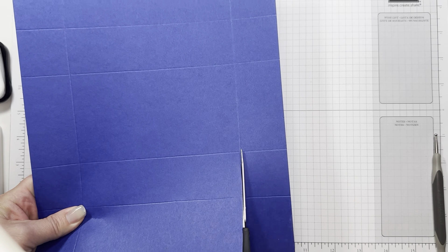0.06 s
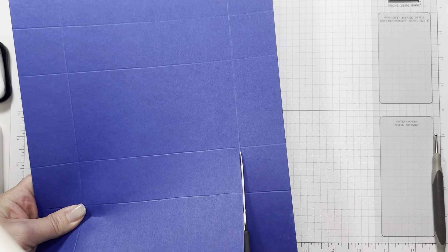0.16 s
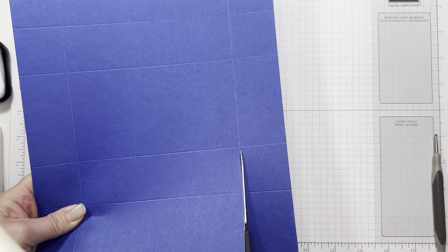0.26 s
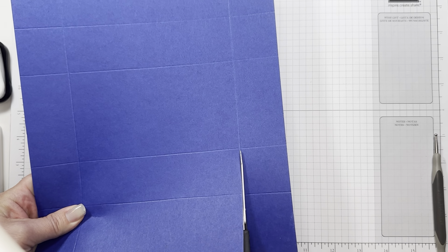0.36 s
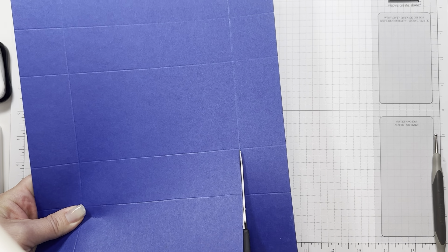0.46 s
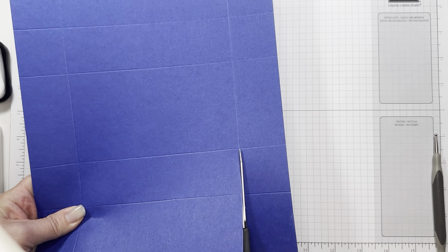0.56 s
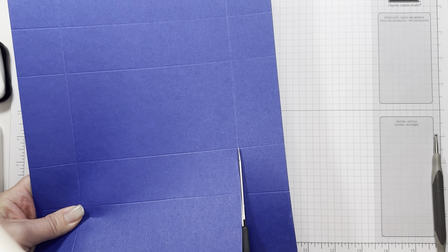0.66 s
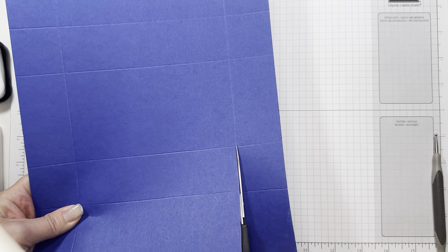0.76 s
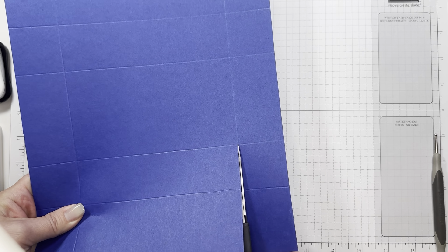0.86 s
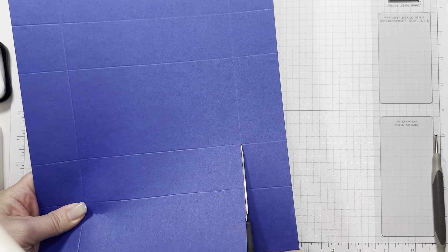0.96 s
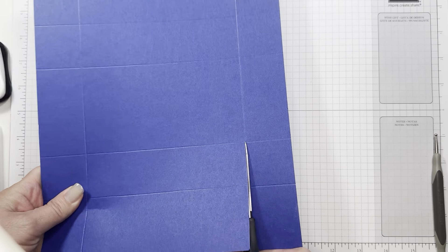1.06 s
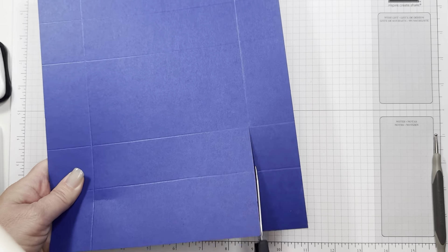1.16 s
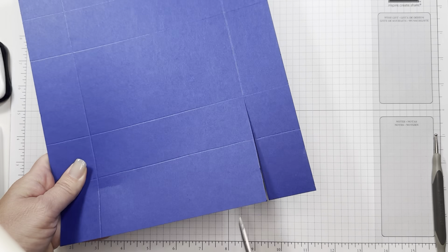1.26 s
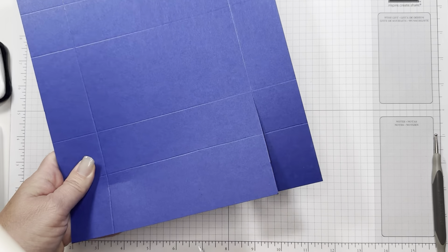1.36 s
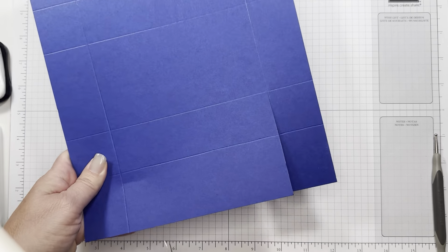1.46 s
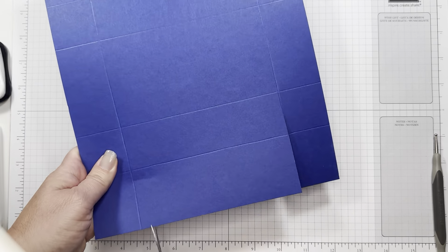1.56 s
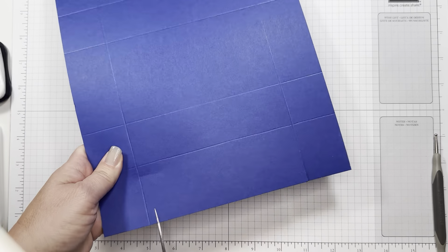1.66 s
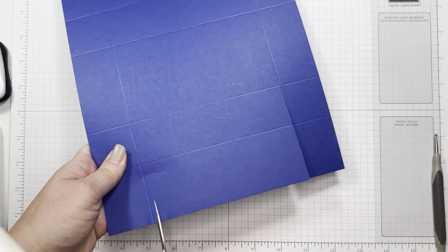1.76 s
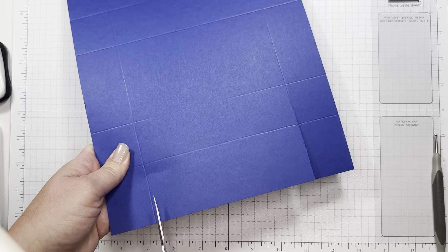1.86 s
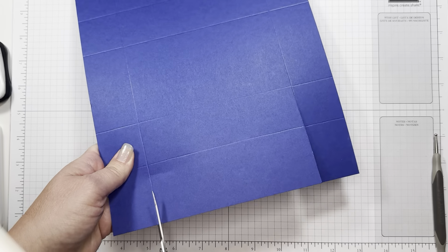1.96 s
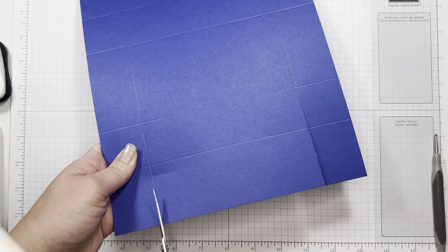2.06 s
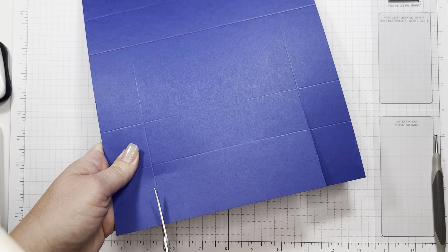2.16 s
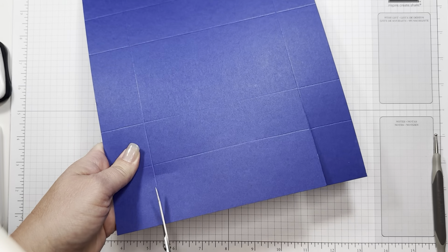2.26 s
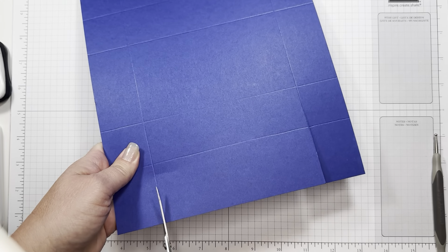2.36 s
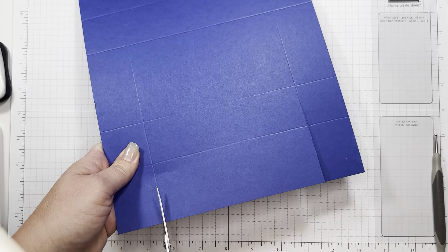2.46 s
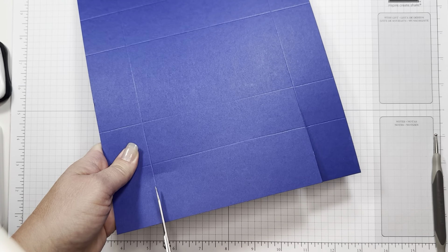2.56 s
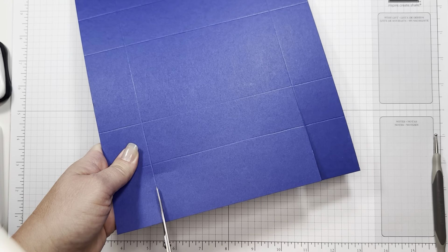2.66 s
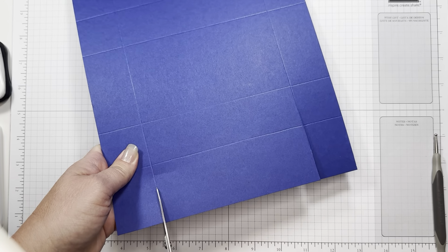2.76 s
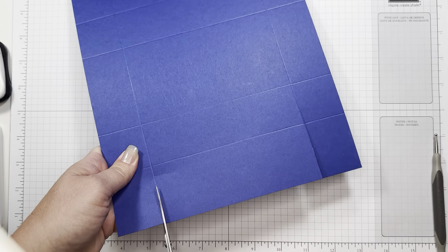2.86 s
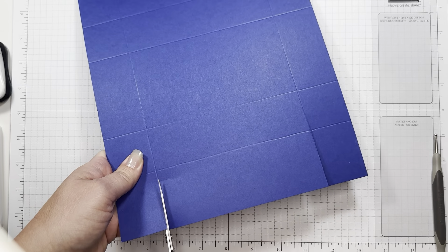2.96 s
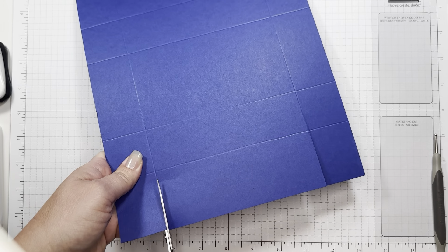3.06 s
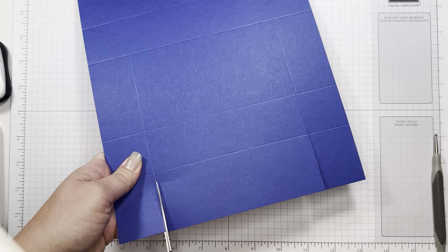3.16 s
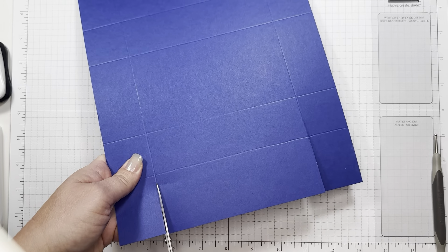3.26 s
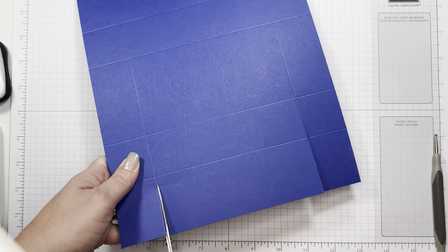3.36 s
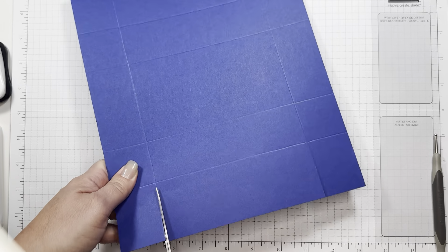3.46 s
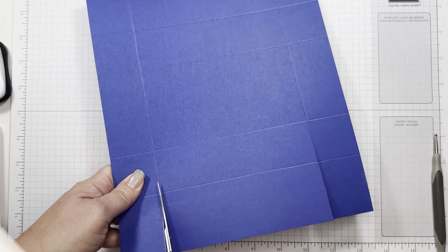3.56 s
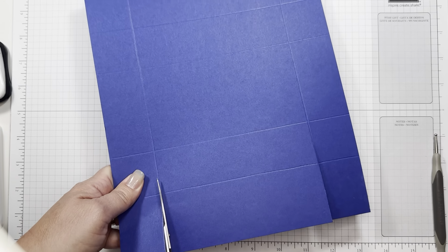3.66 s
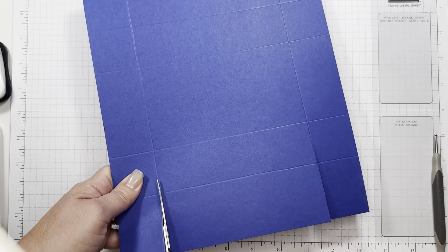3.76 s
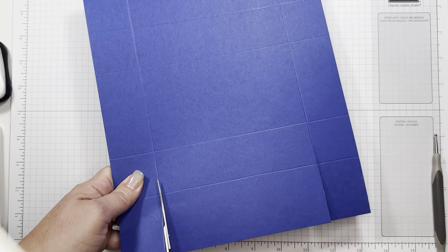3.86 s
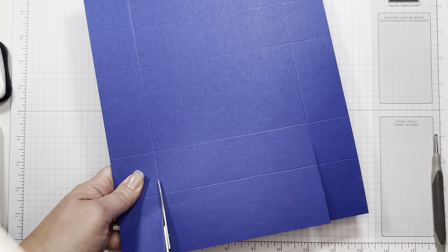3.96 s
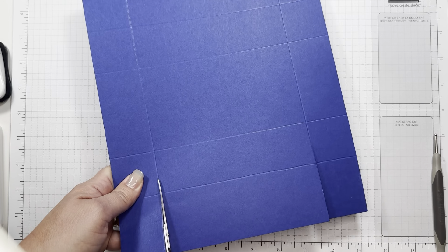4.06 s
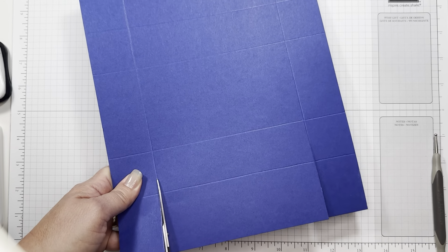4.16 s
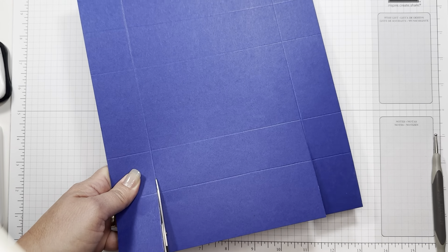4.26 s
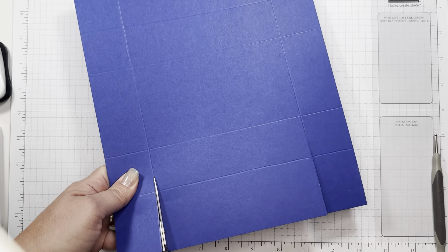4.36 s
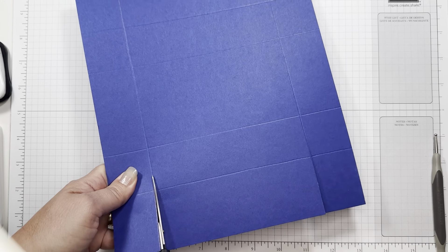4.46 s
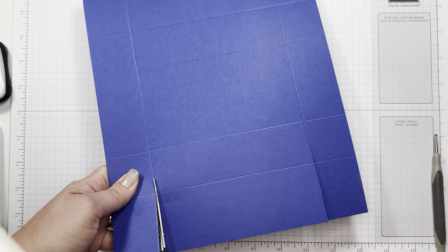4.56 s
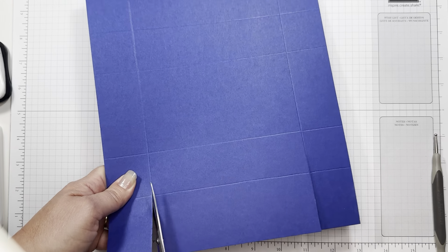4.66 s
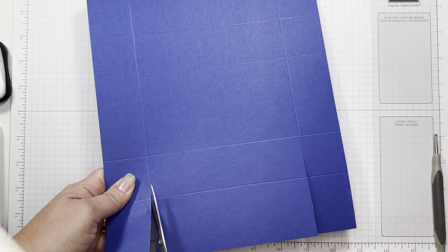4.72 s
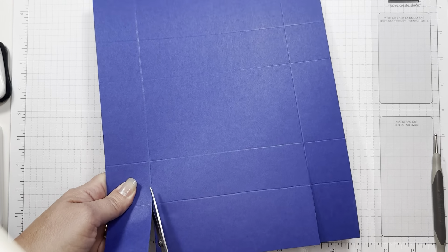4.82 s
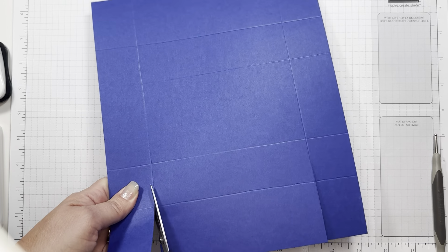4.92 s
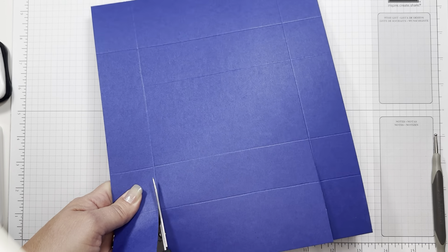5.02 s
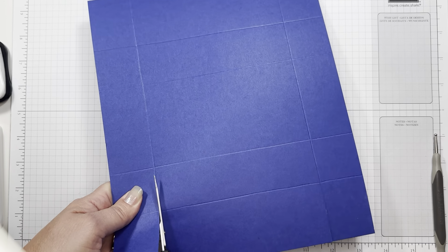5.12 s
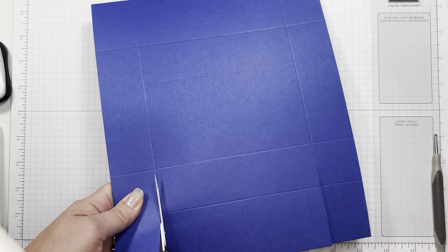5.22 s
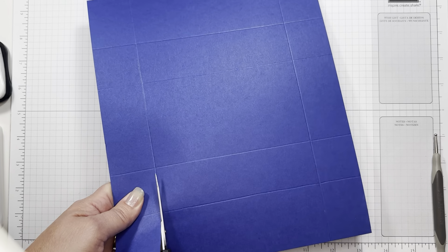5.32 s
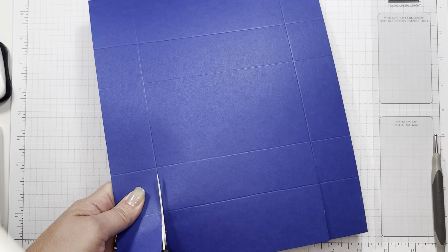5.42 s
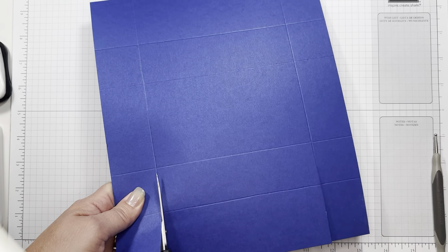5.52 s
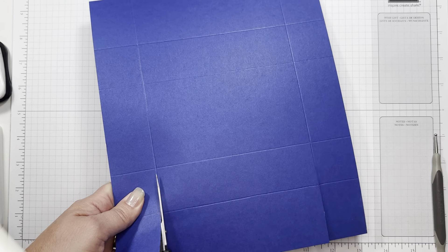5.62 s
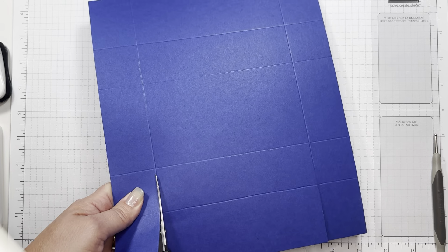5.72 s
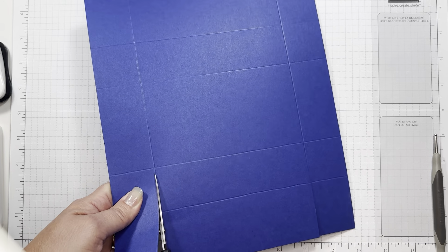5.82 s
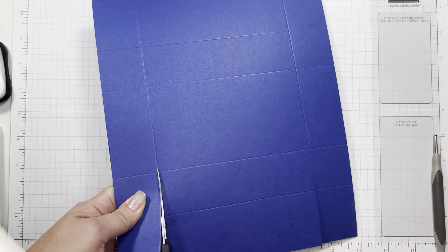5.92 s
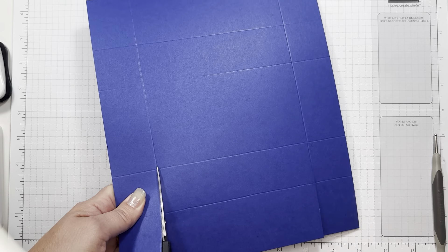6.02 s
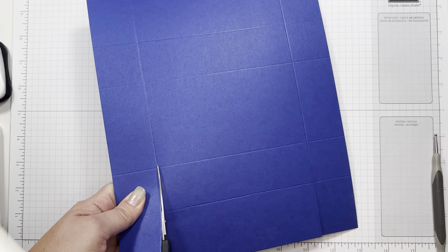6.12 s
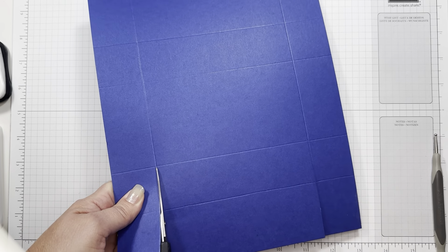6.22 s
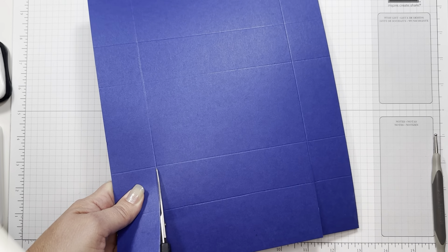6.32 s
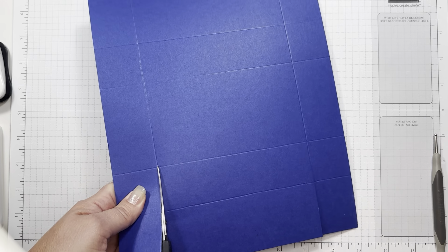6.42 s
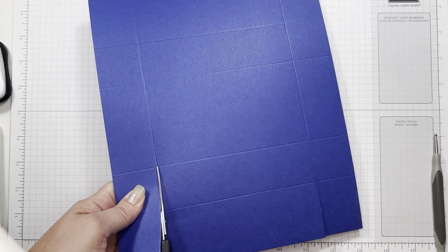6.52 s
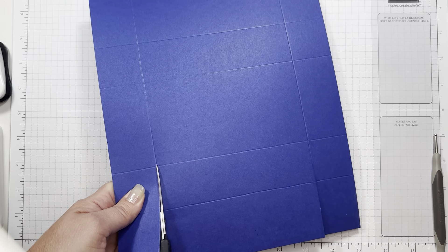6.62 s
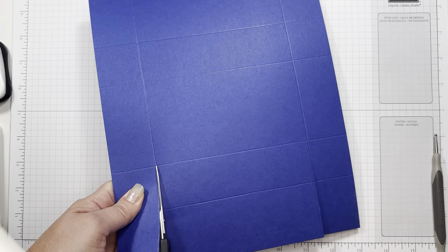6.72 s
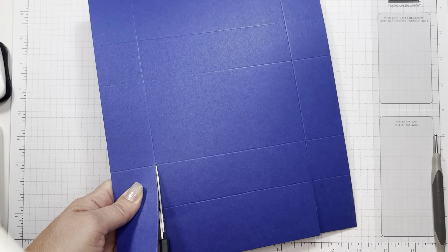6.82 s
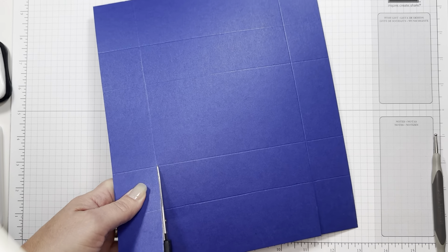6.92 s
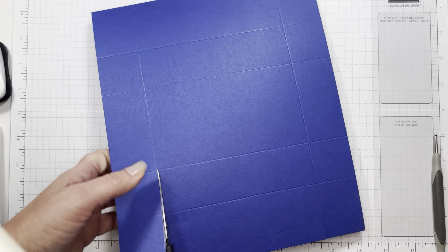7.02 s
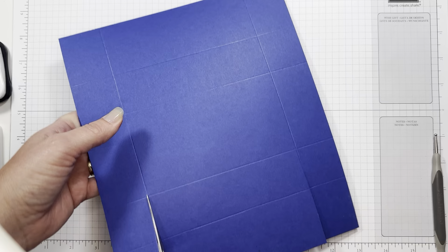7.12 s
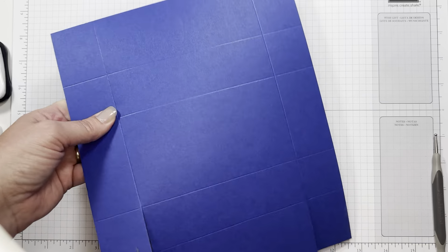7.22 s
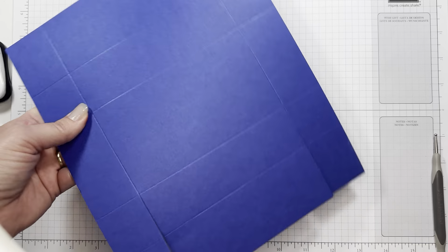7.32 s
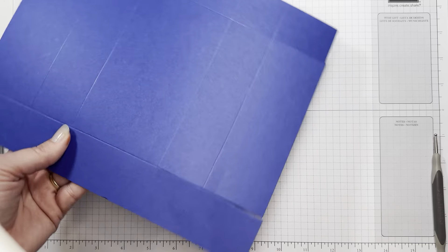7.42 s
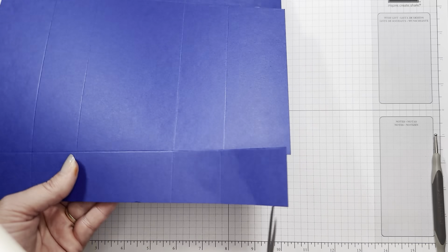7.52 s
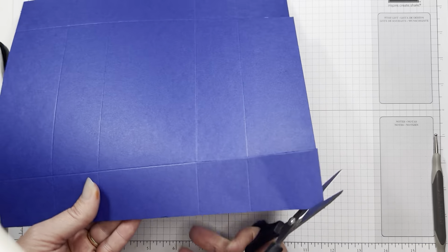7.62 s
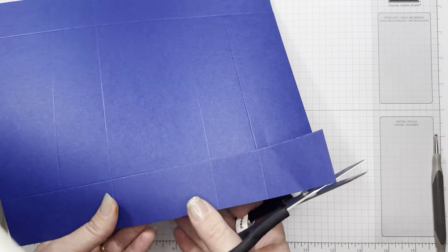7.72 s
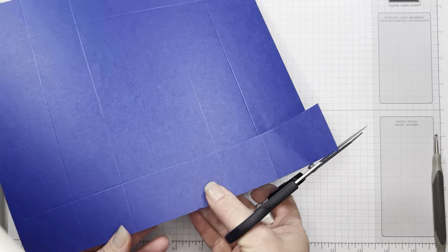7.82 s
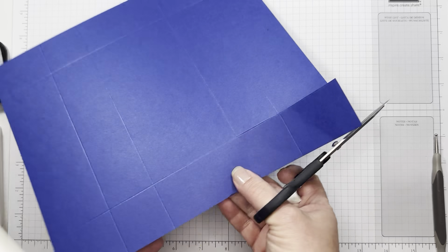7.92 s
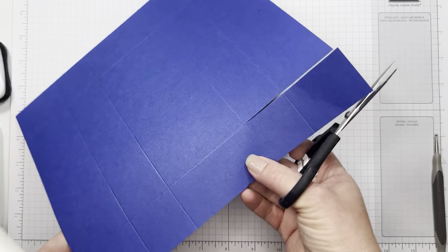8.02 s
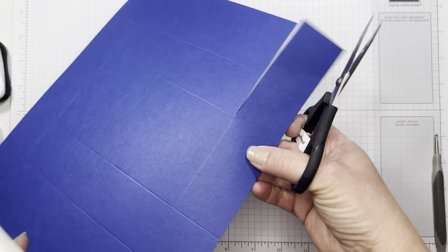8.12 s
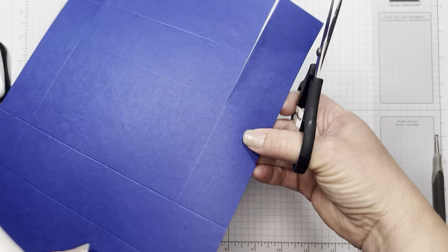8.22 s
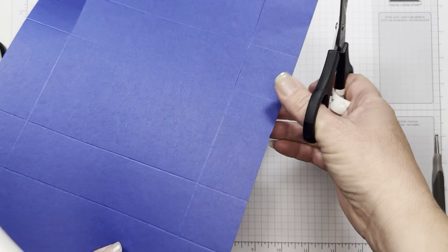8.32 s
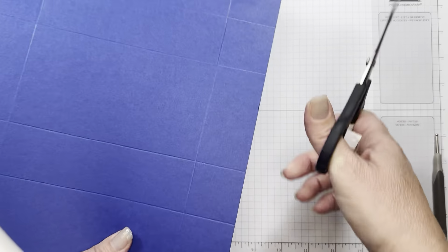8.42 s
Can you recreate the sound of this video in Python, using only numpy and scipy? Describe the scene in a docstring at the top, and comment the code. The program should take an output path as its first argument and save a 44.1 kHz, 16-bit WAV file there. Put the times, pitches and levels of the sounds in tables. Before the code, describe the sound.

Small scissors cut cardstock close to the microphone in a small room, over a faint steady low hum and rumble. A short snip opens, then a loud crunchy cut at about 0.8 seconds ends with the tips snapping shut. The sheet bumps softly just after 1 second, followed by a lull with light rubbing. Quieter runs of crisp, crackly cutting come at about 2.6 to 2.8, 3.2 to 3.5 and 4.0 to 4.3 seconds, with blade scrapes and small ticks between them. A denser run lasts from 5.5 to 5.8 seconds, and a sharper snip closes at around 6.8. From about 7.2 seconds the stiff sheet is turned, with louder pops, hollow flaps and sliding rustles, and an edge squeaks briefly near 7.5. More flapping and tapping follows from about 8.1 to 8.4 seconds.

```python
"""Small scissors cut a sheet of cardstock over a craft table, close under a two-port microphone.
The blades rub and shear the fibres in short tears and the tips snap shut; these forces ring
the modes of the sheet and the blades. The sheet booms and flaps when turned, and an edge squeaks.
A small room rings briefly; a faint hum and rumble stay in the background."""
import sys
import numpy as np
from scipy import signal
from scipy.fft import rfft, irfft, next_fast_len
from scipy.io import wavfile
from scipy.ndimage import uniform_filter1d

SR = 44100
rng = np.random.default_rng(int(sys.argv[2]) if len(sys.argv) > 2 else 0)


def store_wav(level_fs):
    """Save 16-bit WAV to argv[1]."""
    pcm = np.round(np.clip(np.atleast_2d(level_fs), -1, 1) * 32767)
    wavfile.write(sys.argv[1], SR, pcm.T.astype(np.int16))


N = 373968
T = np.arange(N) / SR

# Rumble and air spectrum. Each row: frequency in Hz, relative density in dB.
AIR_SPECTRUM = [(20, -39), (50, 0), (120, -11), (230, -17.5), (340, -15.5), (500, -24.5), (1100, -28),
                (3000, -49.5), (9000, -56.5), (16000, -93.5)]
# Air noise across the ports. Each row: frequency in Hz, left-right coherence.
AIR_COHERENCE = [(60, 1.), (150, 0.63), (300, 0.38), (1000, 0.041), (15000, 0.11)]
# Hum. Each row: frequency in Hz, level in dB.
HUM_TONES = [(123.8, -66.5), (172.3, -62.5)]
# Room decay. Each row: frequency in Hz, T60 in seconds.
ROOM_T60 = [(200, 0.4), (1000, 0.13), (12000, 0.1)]
# Port phase. Each row: frequency in Hz, lead of the left port in radians.
PORT_PHASE = [(0, 0.22), (1700, 1.05), (4000, 0.82), (8000, 2.32), (13000, -0.3), (16000, -1.2)]
# Port balance. Each row: frequency in Hz, left over right in dB.
PORT_BALANCE = [(1600, 0.5), (5000, 3), (15000, -0.5)]
# Sheet resonances. Each row: frequency in Hz, width in Hz, level in dB.
SHEET_MODES = [(950, 150, 4), (1190, 72, -15.5), (1735, 110, -4)]
# Broad radiation of the sheet. Each row: frequency in Hz, relative density in dB.
SHEET_SPECTRUM = [(150, -48.5), (330, -15), (650, -8), (1250, -6.5), (2300, -20.5), (3600, -65.5)]
# Card pinched between the blades. Each row: frequency in Hz, width in Hz, level in dB.
EDGE_MODES = [(990, 190, 8.5), (1806, 930, 3.5)]
# How the sheet is held and faces the microphone. Each row: time in seconds, edge ring in dB,
# edge pitch ratio, top treble gain in dB.
SHEET_HOLD = [(1.5, -1, 0.97, 0), (3.6, 2, 1.067, 1), (4.2, 1, 1.16, 0), (4.7, -0.5, 1.01, 0),
              (5.901, -13.5, 1.22, -13.5), (6.8, -18, 1.04, 6.5), (7.249, -7, 1.14, -5.5)]
# Sheet bends. Each row: time in seconds, boom in dB, flap in dB, flap pitch in Hz.
SHEET_FLEXES = [(.088, -44, -46.5, 373), (1.147, -41, -49.5, 386), (1.7, -58, -47.5, 362),
                (3.495, -43.5, -46, 410), (3.619, -46, -42, 369), (4.666, -59, -42, 380),
                (4.708, -41.5, -65, 362), (7.19, -34, -36, 572), (7.241, -43.5, -33.5, 540),
                (7.319, -41, -50, 410), (7.831, -38.5, -46, 346), (8.167, -39, -37.5, 574),
                (8.2, -41, -31, 636), (8.259, -38.5, -42.5, 398), (8.353, -31.5, -33, 565)]
# Path of one edge squeak. Each row: time in seconds, pitch in Hz, level in dB.
SQUEAK_PATH = [(7.504, 1840, -46), (7.534, 2580, -43.5), (7.55, 1680, -44), (7.605, 1800, -50)]
# Breaking fibres, coloured by the microphone. Each row: frequency in Hz, relative density in dB.
FIBRE_SPECTRUM = [(900, -50), (2200, -2), (3100, -8), (4300, -1), (7500, -5.5), (9700, -1.5), (11700, -14),
                  (14000, -12.5)]
# Blade resonances. Each row: frequency in Hz, width in Hz, level in dB.
BLADE_MODES = [(3830, 330, 5), (5480, 330, -1), (9300, 700, -10)]
# The hiss's ringing peaks sit higher during handling and lower during cuts.
# Each row: time in seconds, frequency ratio.
HISS_PEAK_SHIFT = [(1.2, 1.1), (1.45, .97), (3.7, 1), (4.15, 1.07), (4.7, 1.02), (6.6, 1.02), (7.2, 1.11)]
# Steel or fingers sliding on card. Each row: start in seconds, length in seconds,
# starting level in dB, swell over the stroke in dB, hiss over body in dB.
RUB_STROKES = [(0.062, 0.1, -52.5, -2, -6.5), (0.36, 0.88, -73, 2, -10.5), (0.777, 0.013, -40.5, 4, -2.5),
               (0.91, 0.086, -58.5, -2, -16), (1.026, 0.075, -63.5, 6.5, 4), (1.12, 0.094, -43, -9, 1),
               (1.417, 0.52, -68, -32, 3), (1.773, 0.33, -63.5, -7, -2.5), (2.457, 0.26, -73, 22, -1.5),
               (2.86, 0.12, -61.5, 7, 4), (3.104, 0.25, -56.5, 0, -0.5), (3.378, 0.14, -75, 17, 6.5),
               (3.474, 0.03, -54.5, 8, 1), (3.562, 0.099, -47.5, -12.5, -4.5),
               (3.988, .12, -74.5, 9.5, -0.5), (4.133, 0.084, -59.5, 12.5, -3), (4.378, 0.097, -60, -9, -7),
               (4.601, 0.11, -59.5, 12.5, -8), (4.784, 0.15, -61.5, -3.5, -7.5), (4.918, 0.13, -62, 8, -4),
               (5.085, 0.0021, -46, 4, -9.5), (5.266, 0.12, -64, -5, -10),
               (5.412, 0.089, -72.5, 16.5, -1.5), (5.546, 0.26, -64.5, 13.5, 1),
               (5.891, 0.099, -52.5, -6.5, 0.5), (6.127, 0.07, -75, 17, -6),
               (6.339, 0.14, -59.5, -13.5, -7), (6.741, 0.081, -57, 19, -2),
               (6.936, 0.041, -56.5, -1.5, 2.5), (7.043, 0.12, -71, 23.5, 0.5),
               (7.161, 0.04, -46, 20.5, -15), (7.274, 0.18, -45, -14.5, -5),
               (7.446, 0.13, -54.5, 12.5, 1.5), (7.64, 0.19, -64.5, 13, 4), (7.822, 0.049, -52.5, 2, -3),
               (7.943, 0.12, -58, 10, -3.5), (8.102, 0.036, -50, 2.5, 1), (8.158, 0.14, -67.5, 17.5, 1.5),
               (8.303, 0.2, -44.5, -27, -17)]
# Fibre tears. Each row: start in seconds, level in dB, hiss over body in dB.
FIBRE_TEARS = [(0.071, -29.5, -11.5), (0.154, -42, -22), (0.377, -43.5, -12), (0.731, -36.5, -29),
               (0.77, -21, -9.5), (0.793, -18.5, -6.5), (1.131, -29, -30), (1.145, -29, -20),
               (1.369, -65.5, 10.5), (1.722, -42.5, -14.5), (2.609, -45, -5), (2.654, -50, 3),
               (2.673, -59, -3), (2.685, -50, 0), (2.702, -62, -2), (2.711, -55, 6), (2.732, -47, 5),
               (2.762, -42.5, 2.5), (3.207, -45, 6.5), (3.26, -39.5, 7), (3.292, -37.5, 5.5),
               (3.333, -58.5, 14), (3.354, -46.5, 7), (3.487, -39, 4), (4.042, -39.5, -5),
               (4.073, -43, -2.5), (4.162, -37, -8), (4.176, -42, 3), (4.2, -35, -4.5), (4.214, -35, 1),
               (4.226, -40, -5), (4.613, -40, -6.5), (4.662, -46, -17), (4.958, -46, -6), (5.003, -36, -7),
               (5.55, -48, -1), (5.58, -37, -2), (5.605, -47, -15), (5.637, -39.5, -0.5), (5.676, -38, -4),
               (5.69, -41, -10), (5.704, -37, 6), (5.71, -38.5, -3), (5.73, -34, -4), (5.737, -36, -9),
               (5.754, -38.5, 5.5), (5.765, -36.5, -3), (5.826, -39.5, 1), (6.765, -39, 6), (6.786, -36, 6),
               (6.803, -36.5, 2), (6.825, -24.5, 2), (7.196, -20, -22), (7.226, -20.5, -10.5),
               (7.455, -31, -1.5), (7.627, -20, -11), (7.74, -38, -6), (8.151, -31.5, -21),
               (8.213, -27, -12)]
# Tips closing and the sheet popping. Each row: start in seconds, level in dB,
# hiss over body in dB, contact time in milliseconds.
SNAP_BLOWS = [(0.067, -30, -25, 0.6), (0.812, -19, -18, 0.19), (0.901, -11, -24.5, 0.19),
              (1.122, -26, -26, 0.12), (4.361, -41, -46, 0.71), (5.261, -35.5, -28, 0.056),
              (5.288, -30.5, -47, 0.98), (5.804, -30.5, -12.5, 0.74), (6.832, -26, -7, 0.21),
              (6.995, -27.5, -37, 0.62), (7.161, -17.5, -26, 0.37), (7.184, -28.5, -10, 0.25),
              (7.385, -29.5, -23, 0.048), (7.622, -18, -30, 0.36), (8.169, -29, -27, 0.38),
              (8.189, -20.5, -16, 0.079), (8.354, -23.5, -49, 0.27)]


def gain_of(db):
    return 10 ** (np.asarray(db) / 20)


def unit_rms(x):
    return x / np.sqrt(np.mean(x ** 2) + 1e-20)


def curve_at(points, hz):
    """Interpolates on a log-frequency axis."""
    point_hz, value = np.transpose(points)
    return np.interp(np.log(hz + 1), np.log(point_hz + 1), value)


def wander(cutoff_hz):
    """Slow random drift, rms 1."""
    return unit_rms(signal.lfilter(*signal.butter(2, cutoff_hz, fs=SR), rng.standard_normal(N)))


def resonant_noise(hz, width_hz, size):
    """Noise in one soft resonance that follows hz, rms 1."""
    carrier = np.exp(2j * np.pi * np.cumsum(hz * np.ones(size)) / SR)
    pole = np.exp(-np.pi * width_hz / SR)
    baseband = signal.lfilter([1], [1, -2 * pole, pole * pole], rng.standard_normal(size) / carrier)
    return unit_rms((carrier * baseband).real)


def impulse_response(modes, spectrum, size=4096):
    """Minimum-phase response of broad radiation plus narrow modes, energy 1."""
    hz = abs(np.fft.fftfreq(size, 1 / SR))
    mode_power = sum(gain_of(db) ** 2 / (1 + (2 * (hz - mode_hz) / width_hz) ** 2) ** 2
                     for mode_hz, width_hz, db in modes)
    gain = np.sqrt(gain_of(curve_at(spectrum, hz)) ** 2 + mode_power)
    log_gain = np.log(np.maximum(gain, 1e-5))
    taps = np.fft.ifft(np.exp(signal.hilbert(log_gain).conj())).real[:size // 2]
    return taps / np.linalg.norm(taps)


def ring(force, pitch_ratio, modes, spectrum):
    """Filters a force through peaks that follow a pitch ratio, by crossfading fixed tunings."""
    tunings = np.arange(.91, 1.2, .03)
    position = np.interp(pitch_ratio, tunings, np.arange(len(tunings)))
    out = np.zeros(N)
    for k, ratio in enumerate(tunings):
        share = np.maximum(1 - abs(position - k), 0)
        response = impulse_response(np.array(modes) * [ratio, ratio, 1], spectrum)
        out += signal.oaconvolve(force * share, response)[:N]
    return out


def air(level_db=-57.5, patch_db=1.6):
    """Rumble and air noise with drifting patches of level."""
    frames, hz = N // 512 + 5, np.fft.rfftfreq(2048, 1 / SR)
    left_re, left_im, other_re, other_im, patches = rng.standard_normal((frames, len(hz), 5)).T
    patches = unit_rms(uniform_filter1d(uniform_filter1d(patches, 6, axis=0), 6, axis=1))
    coherence = curve_at(AIR_COHERENCE, hz)[:, None]
    left = left_re + 1j * left_im
    right = coherence * left + np.sqrt(1 - coherence ** 2) * (other_re + 1j * other_im)
    bins = np.array([left, right]) * gain_of(curve_at(AIR_SPECTRUM, hz)[:, None] + patch_db * patches)
    return gain_of(level_db) * unit_rms(signal.istft(bins, nperseg=2048, noverlap=1536)[1][:, :N])


def hum(waver_db=2.1, drift_hz=1.63):
    """Two low wavering tones, slightly left."""
    out = np.zeros(N)
    for hz, db in HUM_TONES:
        amplitude = np.sqrt(2) * gain_of(db + waver_db * wander(15))
        out += amplitude * np.sin(2 * np.pi * np.cumsum(hz + drift_hz * wander(3.48)) / SR)
    return out * gain_of([[1.2], [-1.2]])


def room(x):
    """Sparse reflections of random sign, each band decaying at its own rate."""
    size = SR // 2
    taps = np.zeros((2, size))
    slots = np.arange(220, size - 20, 20)
    arrivals = slots + rng.integers(0, 20, (2, len(slots)))
    np.put_along_axis(taps, arrivals, rng.choice([-1., 1.], arrivals.shape), 1)
    taps[1] = np.sqrt(.5) * (taps[0] + taps[1])  # the ports share half of the tail
    hz, t, bins = signal.stft(taps, SR, nperseg=256)
    decay = gain_of(-60 * t / curve_at(ROOM_T60, hz)[:, None])
    tail = signal.istft(bins * decay, SR, nperseg=256)[1]
    return signal.fftconvolve(x[None], tail / np.linalg.norm(tail[0]), axes=1)[:, :N]


def ports(x):
    """Each microphone port hears a near source with its own phase and level."""
    size = next_fast_len(N + 4096)
    hz = np.fft.rfftfreq(size, 1 / SR)
    lead_rad = np.interp(hz, *np.transpose(PORT_PHASE))
    left = gain_of(curve_at(PORT_BALANCE, hz) / 2) * np.exp(.5j * lead_rad)
    return irfft(rfft(x, size) * np.array([left, 1 / left]), size)[:, :N]


def sheet_colour(x, depth_db=2):
    """The bending sheet shifts colour in patches, in the treble partly unlike at each port."""
    hz, _, bins = signal.stft(x, SR, nperseg=256, noverlap=192)
    patches = uniform_filter1d(rng.standard_normal((3, *bins.shape[1:])), 3, axis=1)
    patches = unit_rms(uniform_filter1d(uniform_filter1d(patches, 40, axis=2), 40, axis=2))
    spread_rad = .5 * np.minimum(hz / 3000, 1)[:, None]
    per_port = np.exp((1j + 0.086) * spread_rad * patches[1:])
    bins = bins * gain_of(depth_db * patches[0]) * per_port
    return signal.istft(bins, nperseg=256, noverlap=192)[1][:, :N]


def flexing(rise_db_per_s=988, settle_db_per_s=338, boom_hz=81):
    """The sheet bends like a soft drum: a low boom of moved air and a hollow flap."""
    size, lead = SR // 2, SR // 10
    out, t = np.zeros(N + size), (np.arange(size) - lead) / SR
    envelope = gain_of(rise_db_per_s * np.minimum(t, 0) - settle_db_per_s * np.maximum(t, 0))
    for time_s, boom_db, flap_db, flap_hz in SHEET_FLEXES:
        boom = gain_of(boom_db) * resonant_noise(boom_hz, width_hz=144, size=size)
        flap = gain_of(flap_db) * resonant_noise(flap_hz, width_hz=314, size=size)
        out[round(time_s * SR):][:size] += envelope * (boom + flap)
    return out[lead:lead + N]


def squeaking():
    """An edge scrapes as the sheet turns: noise in one gliding resonance."""
    time_s, hz, db = np.transpose(SQUEAK_PATH)
    whistle = resonant_noise(np.interp(T, time_s, hz), width_hz=245, size=N)
    return whistle * gain_of(np.interp(T, time_s, db)) * (T > time_s[0]) * (T < time_s[-1])


def rubbing(grip_db_per_s=2502, release_db_per_s=450, linger_db=-12.5, linger_db_per_s=105,
            slips_per_s=90, slip_s=.0028, steady_drag=0.36):
    """Stick-slip friction: short surges over a steady drag. Returns body and fibre forces."""
    force = np.zeros((2, N))
    for start_s, length_s, db, swell_db, hiss_db in RUB_STROKES:
        span = slice(max(round((start_s - .1) * SR), 0), round((start_s + length_s + .4) * SR))
        t = T[span] - start_s
        after_s = np.maximum(t - length_s, 0)
        stroke_db = grip_db_per_s * np.minimum(t, 0) + swell_db * np.clip(t / length_s, 0, 1)
        # quick release, then light contact lingers
        fade_db = np.maximum(-release_db_per_s * after_s, linger_db - linger_db_per_s * after_s)
        force[:, span] += gain_of(db + stroke_db + fade_db) * gain_of([[0], [hiss_db]])
    slips = (rng.random(N) < slips_per_s / SR) * rng.random(N)
    pole = np.exp(-1 / (slip_s * SR))
    surges = signal.lfilter([1 - pole], [1, -2 * pole, pole * pole], slips)
    grit_db = 2.5 * np.minimum(rng.exponential(1, N), 5)
    grit = unit_rms(gain_of(grit_db) * rng.standard_normal(N))
    return grit * force * unit_rms(steady_drag + surges)


def tearing(rise_s=0.0034, size=1000):
    """Swelling bursts of breaking fibres, crisper than a rub. Returns body and fibre forces."""
    out, age = np.zeros((2, N + size)), np.arange(size) / SR / rise_s
    envelope = age * np.exp(-age * age / 2)
    for start_s, db, hiss_db in FIBRE_TEARS:
        burst = gain_of(db) * envelope * rng.standard_normal(size)
        crisp = gain_of(hiss_db) * signal.lfilter([1, -.6], [1], burst)
        out[:, round(start_s * SR):][:, :size] += [burst, crisp]
    return out[:, :N]


def snapping(crack_s=0.00025, spray_s=0.0041, rebound_s=.011, rebound_db=-23, size=900):
    """Blows, duller with longer contact, with splinters and a rebound. Returns body and fibre forces."""
    out, t = np.zeros((2, N + size)), np.arange(size) / SR
    sheet_peak = abs(impulse_response(SHEET_MODES, SHEET_SPECTRUM)).max()
    for start_s, db, hiss_db, contact_ms in SNAP_BLOWS:
        noise = rng.standard_normal(size)
        contact_s = 1e-3 * max(contact_ms, .05)
        push = np.sin(np.pi * np.clip((t + .5 / SR) / contact_s, 0, 1))
        crack = np.exp(-t / crack_s) * np.diff(noise, prepend=0)
        spray = np.exp(-t / spray_s) * noise
        body = push / push.sum() / sheet_peak + gain_of(-10.5) * spray
        fibres = gain_of(hiss_db) * (spray + gain_of(11.5) * crack)
        blow = np.array([body, fibres])
        blow += gain_of(rebound_db) * np.roll(blow, round(rebound_s * SR), axis=1)
        out[:, round(start_s * SR):][:, :size] += gain_of(db) * blow
    return out[:, :N]


def cutting(top_hz=11500):
    """Rubs, tears and snaps ring the sheet, its pinched edge and the blades."""
    body, fibres = rubbing() + tearing() + snapping()
    time_s, *columns = np.transpose(SHEET_HOLD)
    edge_db, edge_ratio, top_db = (np.interp(T, time_s, column) for column in columns)
    top = signal.sosfiltfilt(signal.butter(4, top_hz, "high", fs=SR, output="sos"), fibres)
    fibres = fibres + (gain_of(top_db) - 1) * top
    sheet_ratio = 1 + 0.043 * wander(6)  # bending drifts the pitch
    sheet = ring(body, sheet_ratio, SHEET_MODES, SHEET_SPECTRUM)
    edge = ring(body * gain_of(edge_db), edge_ratio, EDGE_MODES, np.array(SHEET_SPECTRUM) * [1.2, 1])
    hiss = ring(fibres, np.interp(T, *np.transpose(HISS_PEAK_SHIFT)), BLADE_MODES, FIBRE_SPECTRUM)
    return sheet + edge + hiss


def scene(room_db=-11.5):
    """Scissors and sheet up close, plus room, air and hum."""
    near = cutting() + squeaking()
    flex = flexing()
    return sheet_colour(ports(near)) + flex + gain_of(room_db) * room(near + flex) + air() + hum()


def record(dry, bass_cut_hz=38, band_limit_hz=16050):
    """Microphone bass cut, then the recorder's band limit."""
    cut = signal.sosfilt(signal.butter(4, bass_cut_hz, "high", fs=SR, output="sos"), dry)
    lowpass = signal.firwin(511, band_limit_hz, window=("kaiser", 9), fs=SR)
    return signal.oaconvolve(cut, lowpass[None], "same")


dry = scene()
out = record(dry)
store_wav(out)
```